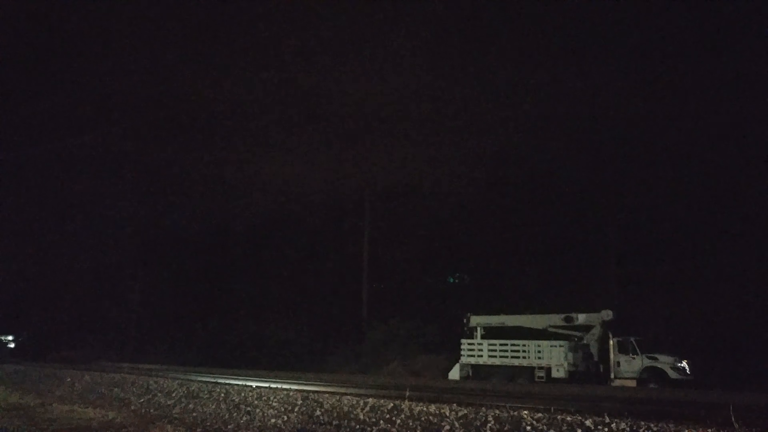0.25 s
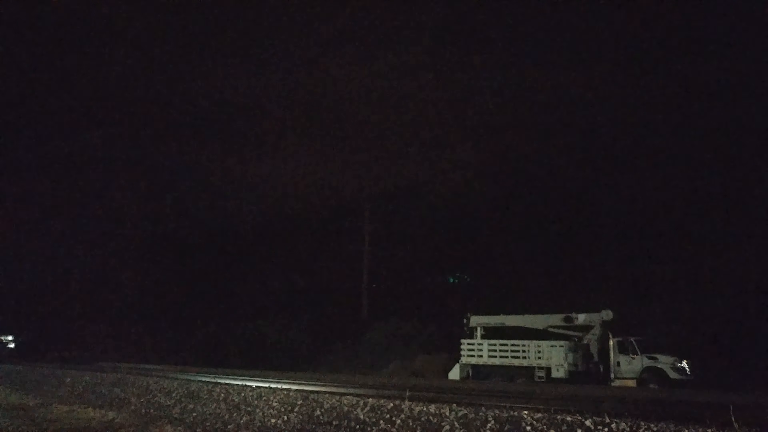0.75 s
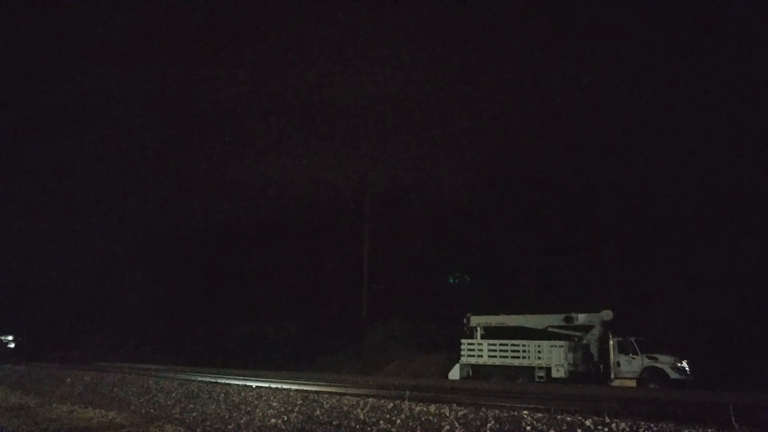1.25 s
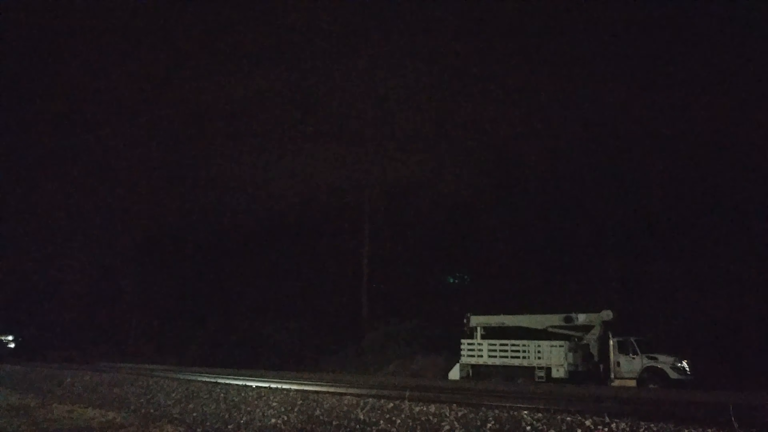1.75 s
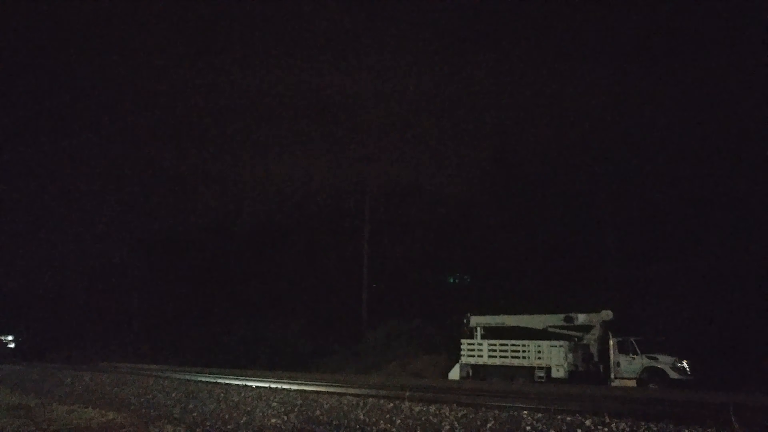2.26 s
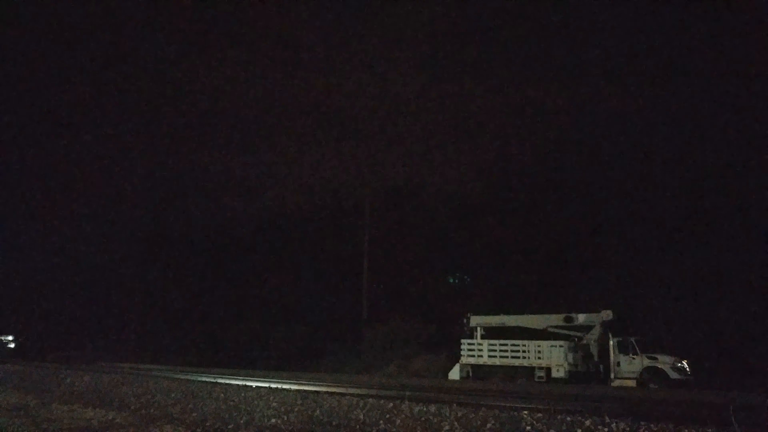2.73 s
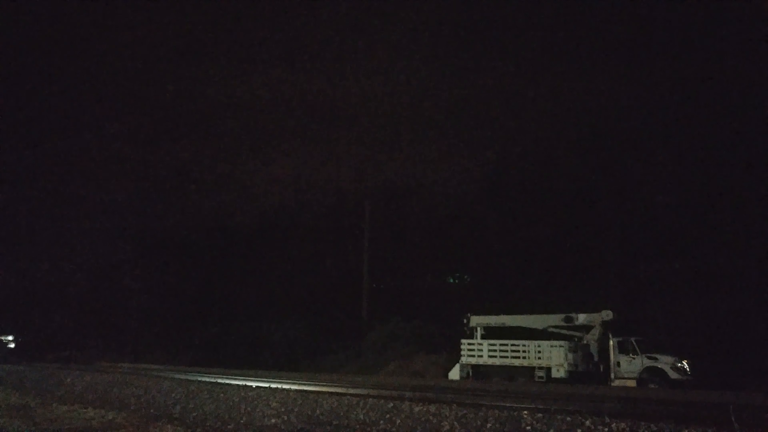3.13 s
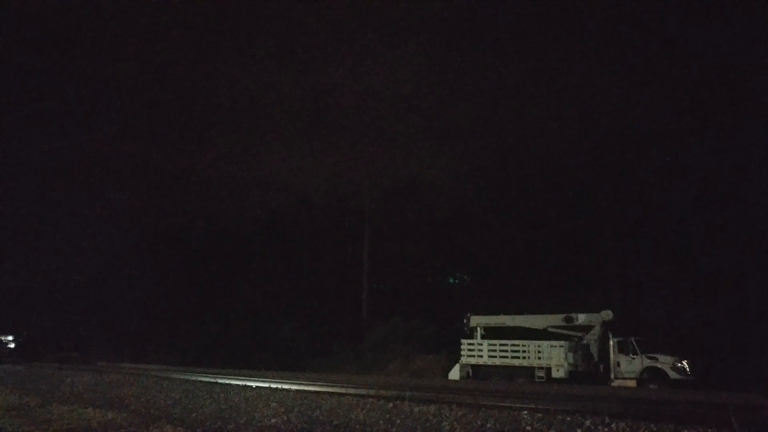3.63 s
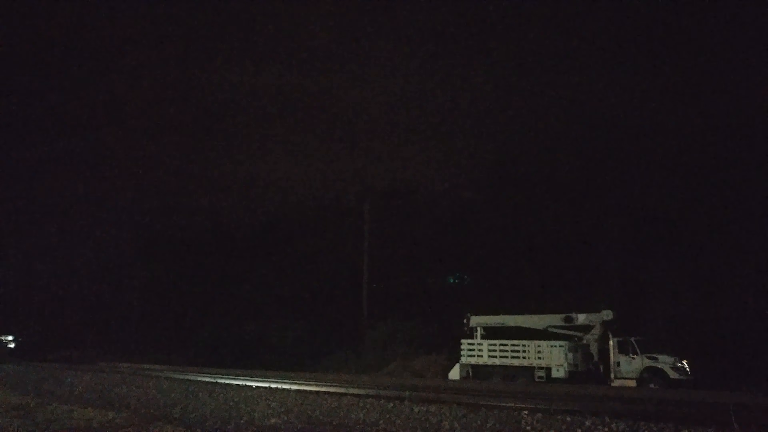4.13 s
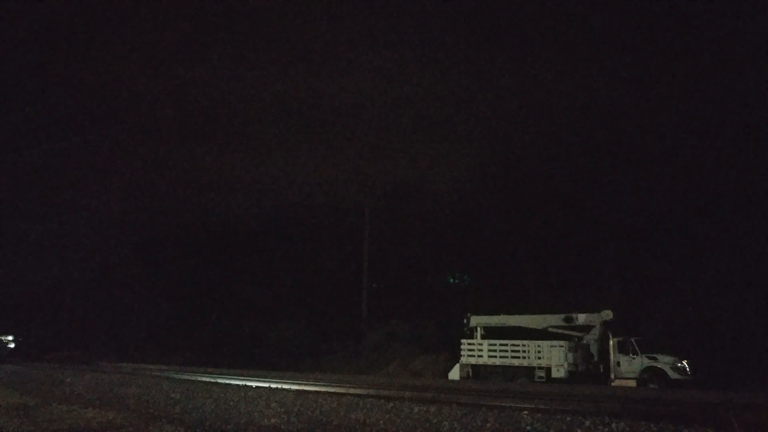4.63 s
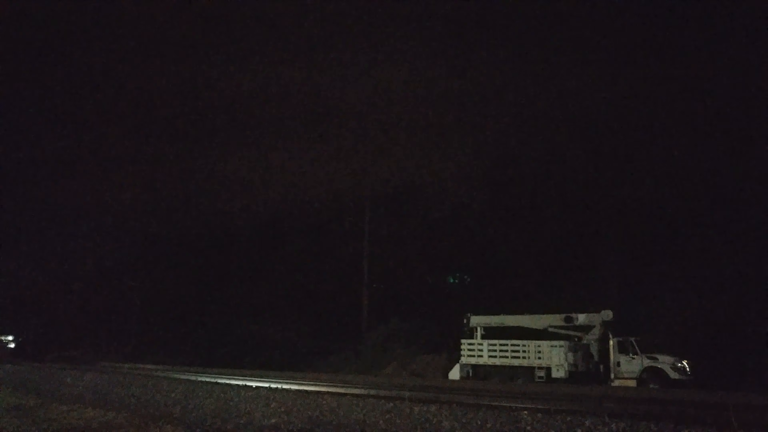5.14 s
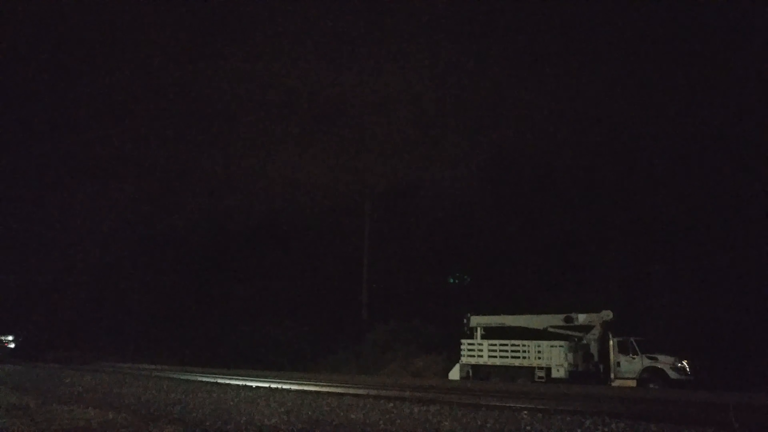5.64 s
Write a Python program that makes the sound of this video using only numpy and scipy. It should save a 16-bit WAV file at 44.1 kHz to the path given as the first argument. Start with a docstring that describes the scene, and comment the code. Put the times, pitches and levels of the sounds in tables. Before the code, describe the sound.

A heavy track-maintenance train is heard outdoors from some way off for about six seconds. Its big diesel runs at one speed throughout, with a deep, rapid throb and low rumble that ease slightly toward the end. Smaller engines hum beside it. Above them is a midrange machinery roar, with hollow metallic resonances that keep swelling and fading.

Two brief grinding scrapes come at about 1.5 seconds. Just before 4 seconds a small stone ticks once in the ballast nearby, followed by a soft scrape and, at about 4.3 seconds, a faint, thin steel squeal gliding slightly upward. Light, short scrapes return near 4.9 and 5.3 seconds, and a stronger, lower one at about 5.7 seconds. All these details stay quiet beside the engines. The sound is much louder on the right than the left, with a faint microphone hiss underneath.

```python
"""Track-maintenance train at night

Some way off, a big diesel runs at one speed; its 4th and 5th shaft orders beat once a turn: the throb.
Smaller engines hum beside it. The machinery roars through housings whose resonances swell and fade,
with brief grinding scrapes, one faint steel squeal and one tick in the ballast nearby.
The left microphone port is much weaker and a little later than the right; both hiss faintly."""
import sys
import numpy as np
from scipy import signal
from scipy.fft import rfft, irfft, dct, next_fast_len
from scipy.io import wavfile
from scipy.ndimage import uniform_filter1d, map_coordinates

SR = 44100
rng = np.random.default_rng(int(sys.argv[2]) if len(sys.argv) > 2 else 0)


def bounce(signal):
    """Save signal as a 16-bit WAV file at the path given by the first command-line argument."""
    frames = np.transpose(np.atleast_2d(signal))
    limited = np.clip(frames, -1, 1)
    pcm = np.round(limited * 32767).astype(np.int16)
    wavfile.write(sys.argv[1], SR, pcm)


N = 259244
SHAFT_HZ, FIRST_THROB_S = 14.756, .029
LEFT_LAG_S, TOP_HZ = .00027, 15720

# orders favoured by the exhaust stack: t/s, 4th level/dB, 5th level/dB
STACK_LEVELS = [(0, -20, -23), (.35, -22, -25), (.62, -21.5, -21.5), (.92, -22.5, -25), (1.1, -21.5, -21.5),
                (1.4, -21.5, -23.5), (1.9, -23.5, -22.5), (2.4, -24, -23), (2.75, -24.5, -26),
                (3.05, -23, -24), (3.4, -23, -26.5), (3.85, -25.5, -25.5), (4, -23, -28.5), (4.5, -26, -28),
                (4.7, -26, -26.5), (5.3, -27, -26), (5.88, -24, -31)]
# low orders in step with the throb: order -> phase/cycles
LOCKED_PHASE = {3: 0, 4: 0, 5: 0, 6: .5, 7: 0, 8: .75}
# shaft orders that stand out as the train moves
CLEAR_ORDERS = (7, 8, 17, 21, 24, 52, 55, 67, 68.5, 83)
# per clear order: resting level/dB
CLEAR_REST_DB = (-43.5, -45.5, -53, -51.5, -57, -59, -56.5, -61, -60.5, -58.5)
# per clear order, swells: centre t/s, length/s, level/dB
CLEAR_SWELLS = [
    [(.5, .6, -48), (1.8, 0.92, -39.5), (3.8, 0.64, -43), (5.3, 0.88, -40)],
    [(2.85, 0.56, -42.5), (3.7, .3, -43.5), (4.35, .4, -38.5), (4.75, .25, -40.5), (5.4, .4, -46)],
    [(.15, 0.47, -41), (3, 0.43, -50.5), (4.1, 1.14, -43)],
    [(2.05, .4, -56), (2.7, 0.2, -50.5), (5.1, 1.5, -52)],
    [(1.5, 0.25, -44.5), (2.25, 0.45, -50.5), (3.8, 0.55, -52.5)],
    [(1, 0.42, -42.5), (1.85, 0.47, -49), (4.25, 0.33, -53)],
    [(1.5, 0.78, -44.5), (3.25, 0.27, -53), (4.45, 0.4, -48), (5.3, 0.65, -48.5)],
    [(.8, 0.82, -56), (2.5, 0.63, -48.5), (5.1, 0.35, -48.5), (5.55, 0.28, -49)],
    [(.7, 0.86, -51.5), (2.5, 0.8, -50.5), (5.7, 0.28, -53.5)],
    [(2.1, .5, -51), (3.55, 0.47, -52), (4.2, 0.65, -51), (5.8, .2, -45)],
]
# faint shaft orders
WEAK_ORDERS = (3, 6, 9, 12, 14, 16, 19, 26, 54, 58, 69, 85, 87)
# per faint order: level/dB
WEAK_ORDER_DB = (-44, -46.5, -54.5, -52.5, -50, -52.5, -59, -59, -58, -59.5, -54.5, -55.5, -58)
# other engines' tones beside an order: f/Hz, order, in-step t/s
BEAT_TONES = [(57.02, 4, .102), (58.0, 4, .378), (59.81, 4, .879), (60.97, 4, .011), (68.81, 5, .04),
              (117.3, 8, .217)]
# per beating tone: level/dB
BEAT_DB = (-47, -46, -41, -41, -47, -47)
# other engines' hums: f/Hz, level/dB
ENGINE_HUMS = [(40.1, -53.5), (41.7, -45.5), (174.5, -58.5), (234.6, -47.5), (352.2, -57)]

# machinery noise spectra, low to high: f/Hz, level/dB
RUMBLE_SPECTRUM = [(20, -20), (33, -20), (42, -1.5), (60, -2), (85, -2.5), (100, -3), (120, -2.5),
                   (150, -6), (200, -8.5), (260, -10.5), (400, -37.5), (700, -120)]
DRONE_SPECTRUM = [(80, -120), (190, -8.5), (260, -2.5), (370, -2.5), (450, -7.5), (600, -6), (800, -19),
                  (1500, -120)]
ROAR_SPECTRUM = [(250, -120), (450, -17), (700, -4), (930, 0), (1100, 0.5), (1280, -2), (1400, -4),
                 (2000, -8.5), (2600, -21), (4000, -46.5), (8000, -120)]
RASP_SPECTRUM = [(800, -120), (1800, -9.5), (2300, 0.5), (3000, -2.5), (3500, -11.5), (4000, -19),
                 (4600, -38.5), (12000, -120)]
FIZZ_SPECTRUM = [(2000, -120), (3800, -0.5), (4500, 0), (5200, -1.5), (6300, -10.5), (7200, -24.5),
                 (12000, -96.5)]
# per spectrum above: level/dB, fade/(dB/s), share of roar swing, share of rasp swing, waver/dB
NOISE_LAYERS = [(-34, 0.62, 0.017, 0.03, 1.3), (-42.5, .5, 0.61, 0, 0.65), (-38.5, 0, 0.68, 0.2, 0),
                (-51.5, 0, 0.03, 1, 1.12), (-71.5, 0, 0.073, .3, 0.4)]
# swings, taken about their means: t/s, roar level/dB, grinding rasp level/dB
LOAD_SWINGS = [(0.0, -42.5, -47.5), (0.05, -45.5, -50), (1.0, -49.5, -54), (1.3, -46.5, -50.5),
               (1.5, -46, -52), (1.7, -47, -53.5), (2.06, -46.5, -50.5), (2.91, -49, -55.5),
               (3.0, -45.5, -53), (3.31, -47.5, -56.5), (3.42, -47.5, -52), (4.19, -47.5, -51.5),
               (4.22, -49, -54), (4.6, -48, -53), (4.85, -46, -53), (5.01, -46, -52.5),
               (5.53, -45.5, -53.5), (5.7, -44.5, -47.5), (5.76, -46, -51.5), (5.88, -44, -47.5)]
# housing resonances: f/Hz, width/Hz
HOUSING_BANDS = [(689, 63), (790, 71), (864, 45), (1004.4, 71), (1250.6, 75), (1160, 30), (1389, 53)]
# per housing: resting level/dB
HOUSING_REST_DB = (-54.5, -51, -50.5, -54, -51, -61.5, -60.5)
# per housing, swells: centre t/s, length/s, level/dB
HOUSING_SWELLS = [
    [(.7, 1.9, -48.5), (2.5, 0.18, -47.5)],
    [(.4, 0.3, -39.5), (1.25, 0.54, -40), (1.9, 0.34, -41.5), (2.5, 0.44, -42.5), (3.2, 0.26, -43.5),
     (4.15, 0.14, -43), (4.52, 0.19, -40), (5.15, 0.22, -43), (5.4, .5, -46.5), (5.8, 0.11, -43)],
    [(.05, 0.21, -41.5), (1.3, 0.64, -41.5), (1.8, 0.23, -45.5), (2.3, .35, -41.5), (4.5, 0.25, -49),
     (5.4, 0.63, -48)],
    [(.1, 0.37, -48.5), (.7, 0.89, -40.5), (1.8, 0.22, -42), (2.5, 0.59, -43), (3.15, 0.26, -43.5),
     (3.5, 0.67, -46.5), (4.55, 0.27, -45.5), (5.08, 0.2, -44), (5.65, 0.34, -42.5)],
    [(.4, 0.22, -45), (1.35, 0.44, -41), (2.05, 0.66, -41.5), (2.8, 0.32, -46.5), (3.6, 0.47, -43.5),
     (4.1, 0.26, -43.5), (4.5, .2, -45.5), (4.9, 0.69, -44), (5.78, 0.18, -39)],
    [(1.5, .3, -53), (3.95, .45, -49), (4.7, 0.63, -49)],
    [(3, .5, -54), (4, .5, -53.5), (5.3, .8, -51.5)],
]
# grinding scrapes: centre t/s, length/s, level/dB, f/Hz, width/Hz
GRIND_SCRAPES = [(1.475, 0.06, -48, 2600, 1100), (1.584, 0.088, -49.5, 2860, 800),
                 (4.02, 0.28, -54.5, 2550, 1200), (4.925, 0.092, -55, 2700, 996),
                 (5.269, 0.093, -54, 2700, 1900), (5.74, 0.19, -46.5, 1790, 400)]
# steel squeal: centre t/s, length/s, level/dB, f/Hz, rise/(Hz/s)
STEEL_SQUEAL = (4.31, .22, -55.5, 1960, 500)
# ballast tick: t/s, level/dB before filtering
BALLAST_TICKS = [(3.933, -47)]

# left-right likeness of the machinery noise: f/Hz, coherence
PORT_COHERENCE = [(60, .99), (200, .92), (500, .7), (1000, .72), (2000, .4), (4000, .2)]
# left port against right: f/Hz, level/dB
LEFT_RESPONSE = [(60, -25.5), (94, -23), (150, -27), (230, -24.5), (360, -24), (570, -22.5), (890, -27.5),
                 (1400, -25.5), (2200, -22.5), (3450, -20)]
# preamplifier hiss: f/Hz, level/dB
HISS_SPECTRUM = [(100, -3), (4000, 1), (5500, 1.5), (7200, -2.5), (8100, 0.5), (8700, -3.5), (10500, -8),
                 (13000, -3), (16000, -5)]


def engines():
    """Diesel shaft orders, the 4th and 5th beating once a turn; other engines beat with them and hum."""
    t = np.arange(N) / SR
    turns = SHAFT_HZ * (t - FIRST_THROB_S)
    order_cycles = lambda k: k * turns + LOCKED_PHASE.get(k, rng.random())
    fourth_db, fifth_db = curves(STACK_LEVELS)
    throb = amp(fourth_db) * tone(4 * turns, .2, .08) + amp(fifth_db) * tone(5 * turns, .2, .08)
    beats = sum(amp(db) * tone(order_cycles(k) + (hz - k * SHAFT_HZ) * (t - in_step_s), .5, .38)
                for (hz, k, in_step_s), db in zip(BEAT_TONES, BEAT_DB))
    clear = sum(swell_gain(swells, db) * tone(order_cycles(k), 1.2, .4)
                for k, db, swells in zip(CLEAR_ORDERS, CLEAR_REST_DB, CLEAR_SWELLS))
    weak = sum(amp(db) * tone(order_cycles(k), 2.0, .12 * np.sqrt(k))
               for k, db in zip(WEAK_ORDERS, WEAK_ORDER_DB))
    hums = sum(amp(db) * tone(hz * t, .88, .21) for hz, db in ENGINE_HUMS)
    return throb + beats + clear + weak + hums


def machinery_roar():
    """Five broad noise layers, each following the roar and rasp swings by its own share."""
    from_middle_s = (np.arange(N) - N / 2) / SR
    roar_db, rasp_db = [db - db.mean() for db in curves(LOAD_SWINGS)]
    spectra = RUMBLE_SPECTRUM, DRONE_SPECTRUM, ROAR_SPECTRUM, RASP_SPECTRUM, FIZZ_SPECTRUM
    sound = 0
    for (db, fade_db_per_s, roar_share, rasp_share, waver_db), spectrum in zip(NOISE_LAYERS, spectra):
        swing_db = roar_share * roar_db + rasp_share * rasp_db + waver_db * wobble(9)
        level_db = db - fade_db_per_s * from_middle_s + swing_db
        sound += amp(level_db) * noise_pair(db_response(spectrum), patchy_db=.7)
    return sound


def housings(surge_db=1.1):
    """Housings ring in narrow noise bands, with swells and quick random surges."""
    sound = 0
    for (hz, width_hz), rest_db, swells in zip(HOUSING_BANDS, HOUSING_REST_DB, HOUSING_SWELLS):
        gain = swell_gain(swells, rest_db) * amp(surge_db * wobble(9.2))
        ring = noise_pair(mode_cluster(hz, width_hz), patchy_db=-.5)
        sound += gain * levelled(ring)
    return sound


def scrapes():
    """Grinding: brief bursts of band noise."""
    return sum(swell_gain([(at_s, length_s, db)]) * noise_pair(mode_cluster(hz, width_hz), patchy_db=1.5)
               for at_s, length_s, db, hz, width_hz in GRIND_SCRAPES)


def squeal():
    """Steel squeals: a thin wavering tone gliding up."""
    at_s, length_s, db, hz, rise_hz_per_s = STEEL_SQUEAL
    t = np.arange(N) / SR - at_s
    cycles = hz * t + rise_hz_per_s * t ** 2 / 2
    return swell_gain([(at_s, length_s, db)]) * tone(cycles, waver_db=2.5, drift_rad=1.3)


def ballast_tick(t60_s=.018):
    """A small stone shifts: a short bright snap."""
    snap = np.zeros(N + SR)
    t = np.arange(SR // 20) / SR
    for at_s, db in BALLAST_TICKS:
        snap[round(at_s * SR):][:len(t)] += amp(db - 60 * t / t60_s) * rng.standard_normal(len(t))
    return filtered(snap[:N], mode_cluster(hz=5200, width_hz=2600))


def amp(db):
    """dB to gain."""
    return 10 ** (np.asarray(db) / 20)


def unit_rms(x):
    """Scale to rms 1."""
    return x / np.sqrt(np.mean(x ** 2) + 1e-20)


def log_interp(points, hz):
    """Interpolate (f/Hz, value) points over log frequency."""
    knots_hz, values = np.transpose(points)
    return np.interp(np.log(hz + 1), np.log(knots_hz + 1), values)


def curves(rows):
    """Per-sample curve for each column after t/s."""
    knots_s, *columns = np.transpose(rows)
    return [np.interp(np.arange(N) / SR, knots_s, column) for column in columns]


def wobble(rate_hz):
    """Smooth random curve, knots at rate_hz."""
    return map_coordinates(rng.standard_normal(int(N * rate_hz / SR) + 4), [np.arange(N) * rate_hz / SR])


def swell_gain(swells, rest_db=-np.inf, steepness=2.2):
    """Resting level plus bell-shaped swells, summed in power."""
    t = np.arange(N) / SR
    swell_power = sum(amp(2 * db) * np.exp(-np.abs(2 * (t - at_s) / length_s) ** steepness)
                      for at_s, length_s, db in swells)
    return np.sqrt(amp(2 * rest_db) + swell_power)


def levelled(x, window_s=.2):
    """Divide by the running rms."""
    return x / np.sqrt(np.abs(uniform_filter1d(x ** 2, size=round(window_s * SR))) + 1e-9)


def db_response(points):
    """Response through (f/Hz, level/dB) points."""
    return lambda f: amp(log_interp(points, f))


def mode_cluster(hz, width_hz):
    """Flat-topped response of close modes."""
    return lambda f: 1 / (1 + (2 * (f - hz) / width_hz) ** 4)


def filtered(x, response):
    """Apply a complex frequency response."""
    size = next_fast_len(N + SR // 2)
    return irfft(rfft(x, size) * response(np.fft.rfftfreq(size, 1 / SR)), size)[..., :N]


def tone(cycles, waver_db, drift_rad):
    """Sine, rms near 1; level and phase waver on the way through the air."""
    gain = np.sqrt(2) * amp(waver_db * wobble(2.8))
    return gain * np.cos(2 * np.pi * cycles + drift_rad * wobble(2.52))


def noise_pair(response, patchy_db):
    """Two uncorrelated noises of one colour, rms 1, sharing random time-frequency gain patches."""
    spectra = signal.stft(rng.standard_normal((2, N + 512)), nperseg=512)[2]
    patches = uniform_filter1d(rng.standard_normal(spectra.shape[1:]), 6, axis=0)
    patches = unit_rms(uniform_filter1d(patches, 20, axis=1))
    noise = signal.istft(spectra * amp(patchy_db * patches), nperseg=512)[1][:, :N]
    return unit_rms(filtered(noise, response))


def scene():
    """Left, right. Direct sound reaches the left port late; some noise arrives there by other paths."""
    direct, scattered = machinery_roar() + housings() + scrapes()
    coherent = engines() + ballast_tick() + squeal()
    coherence = lambda f: np.clip(log_interp(PORT_COHERENCE, f), 0, 1)
    lag = lambda f: np.exp(-2j * np.pi * f * LEFT_LAG_S)
    left = filtered(direct, lambda f: coherence(f) * lag(f)) + filtered(coherent, lag)
    left += filtered(scattered, lambda f: np.sqrt(1 - coherence(f) ** 2))
    return amp(5.0) * np.array([left, direct + coherent])


def record(dry):
    """Weak left port, hiss of both preamplifiers, band limit."""
    ports = np.array([filtered(dry[0], db_response(LEFT_RESPONSE)), dry[1]])
    hiss = amp([[-72], [-71]]) * noise_pair(db_response(HISS_SPECTRUM), patchy_db=1.3)
    passband = np.arange(N) * SR / (2 * N) < TOP_HZ
    return dct(dct(ports + hiss, norm="ortho") * passband, type=3, norm="ortho")


dry = scene()
out = record(dry)
bounce(out)
```